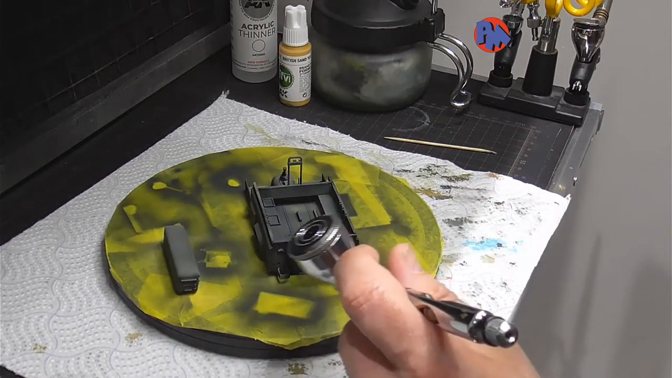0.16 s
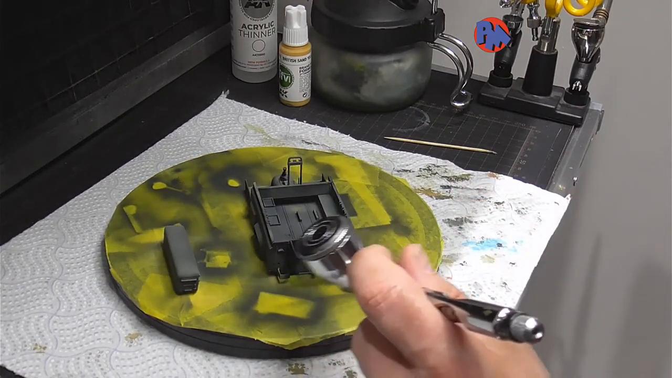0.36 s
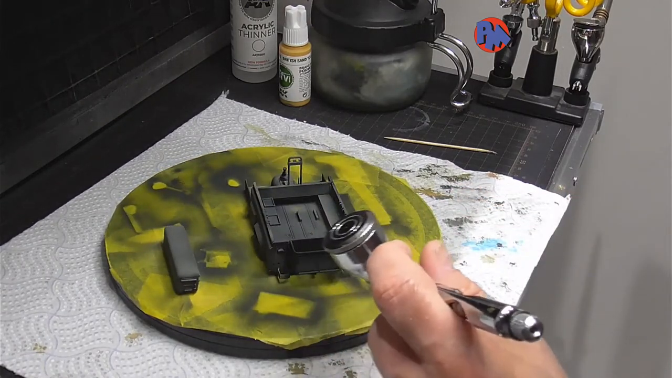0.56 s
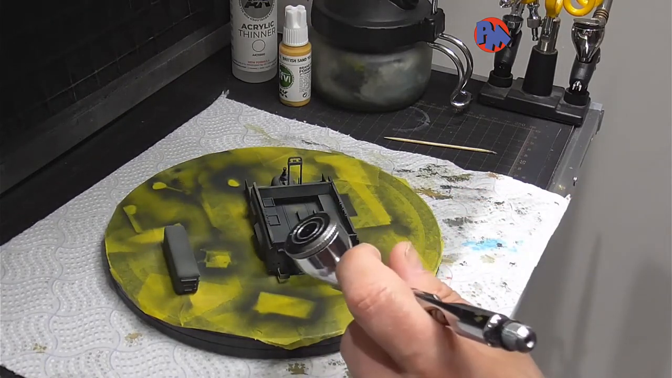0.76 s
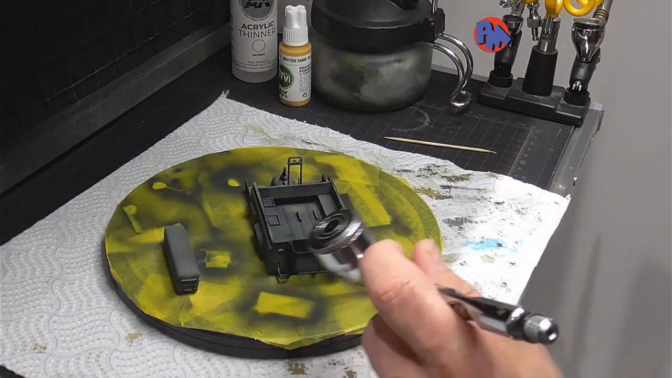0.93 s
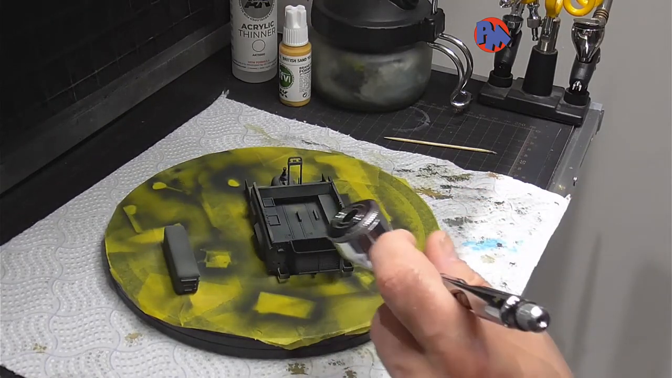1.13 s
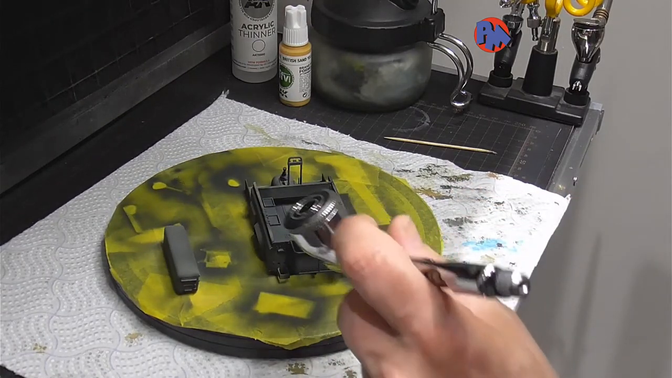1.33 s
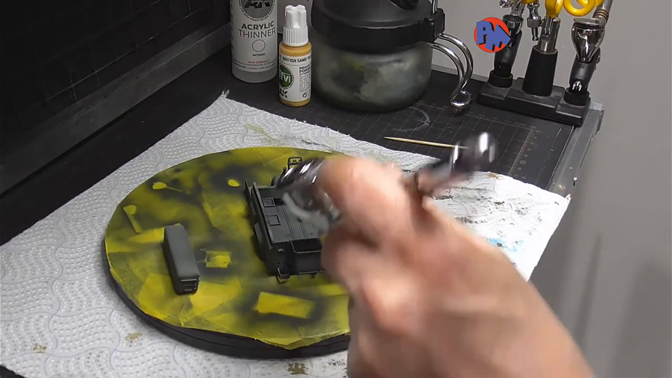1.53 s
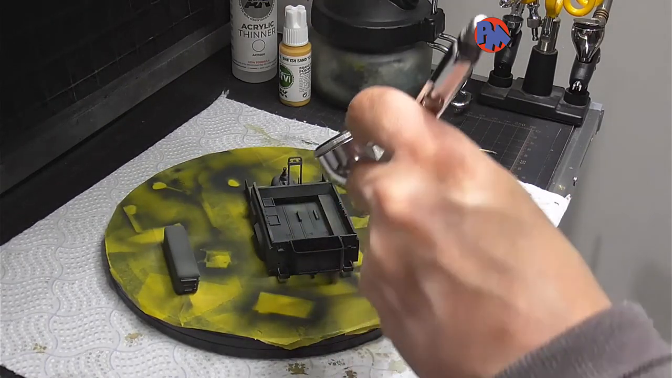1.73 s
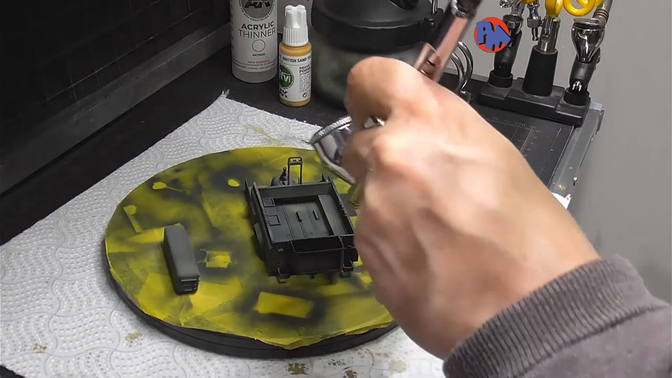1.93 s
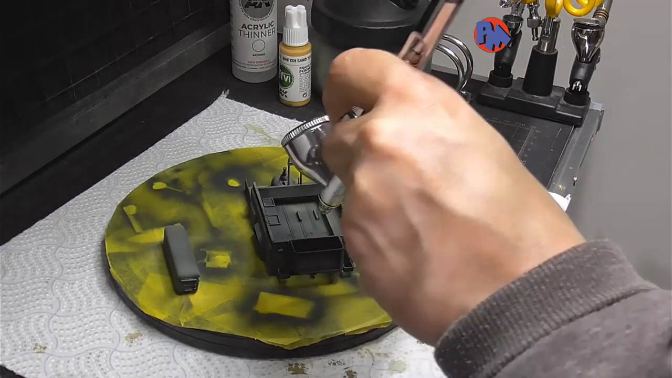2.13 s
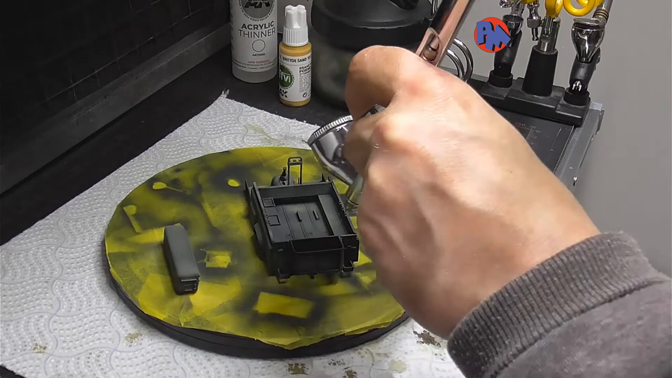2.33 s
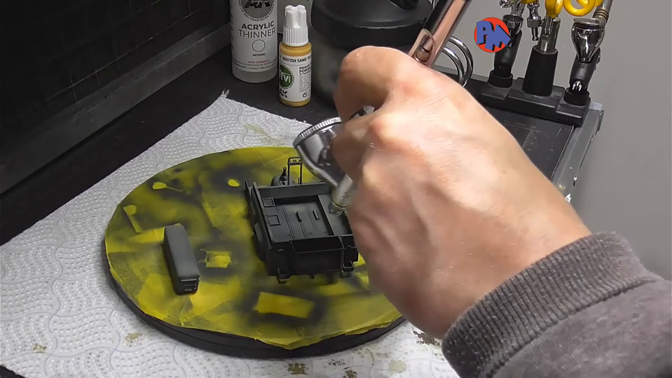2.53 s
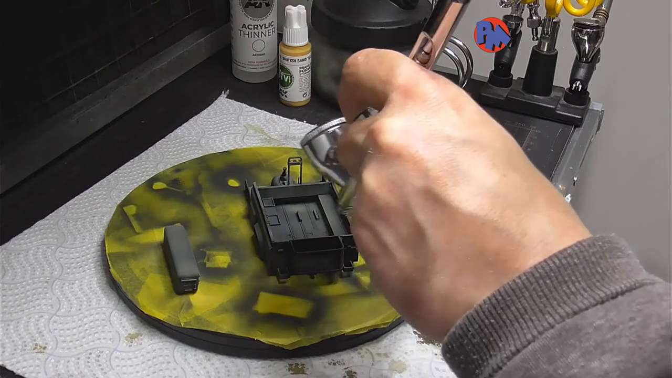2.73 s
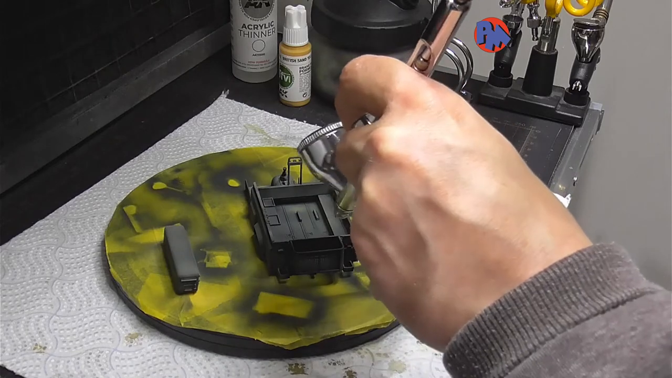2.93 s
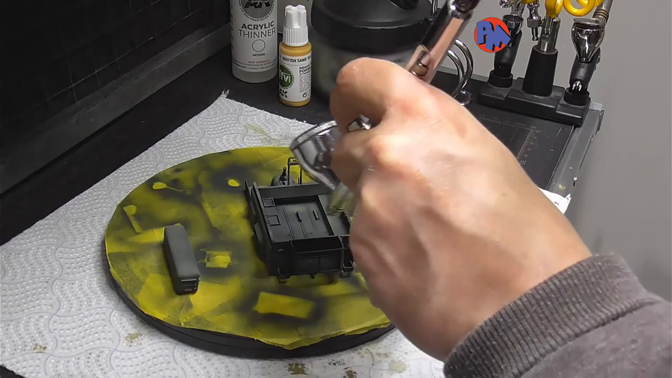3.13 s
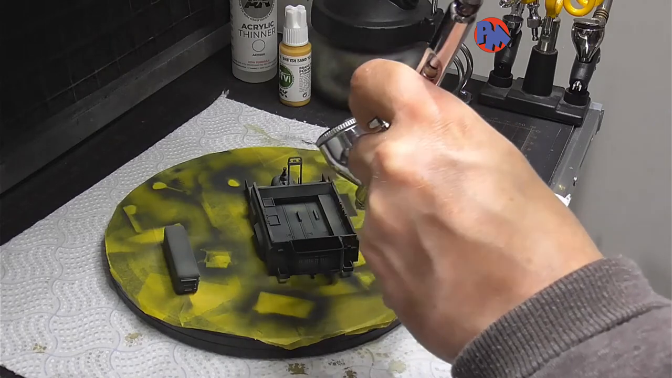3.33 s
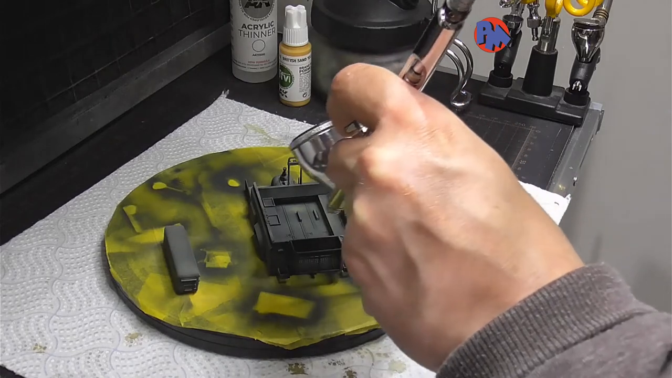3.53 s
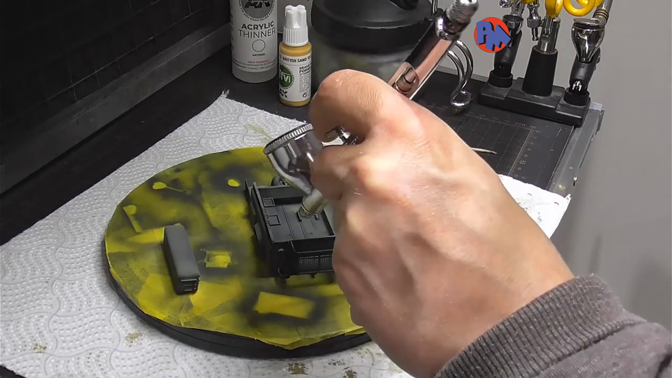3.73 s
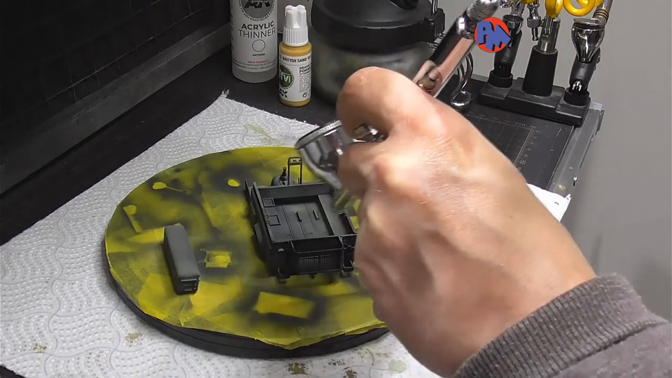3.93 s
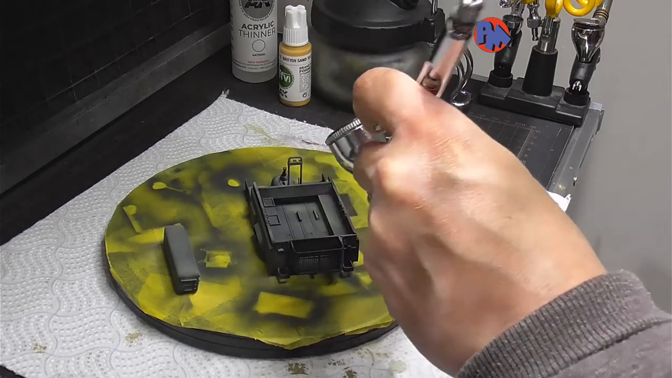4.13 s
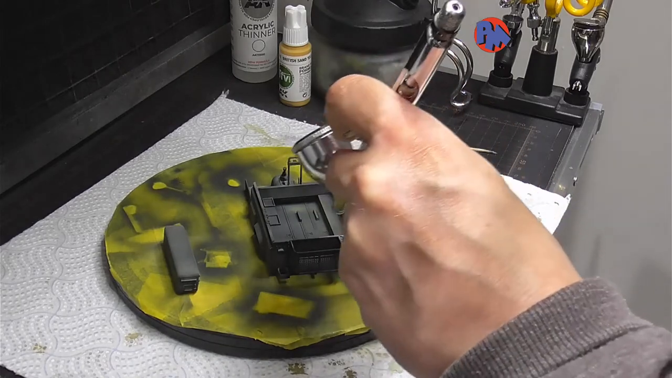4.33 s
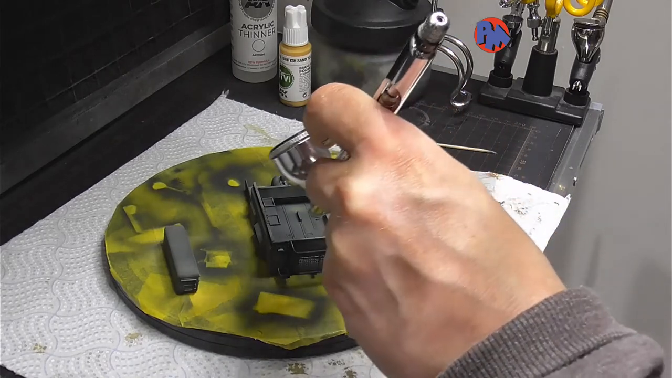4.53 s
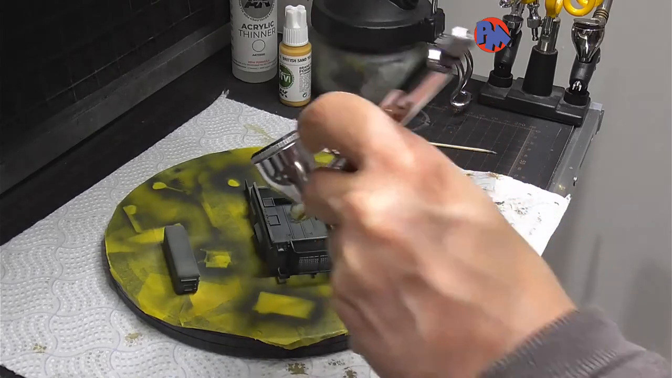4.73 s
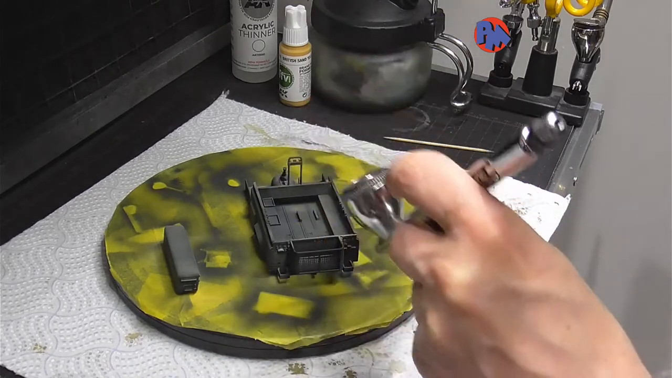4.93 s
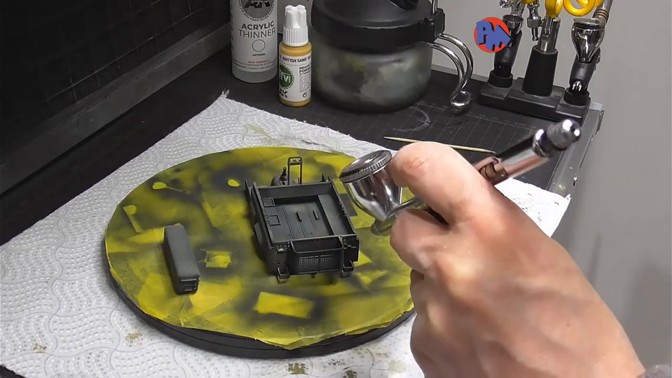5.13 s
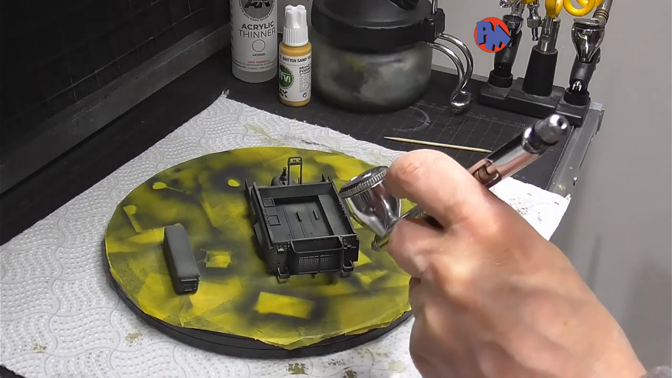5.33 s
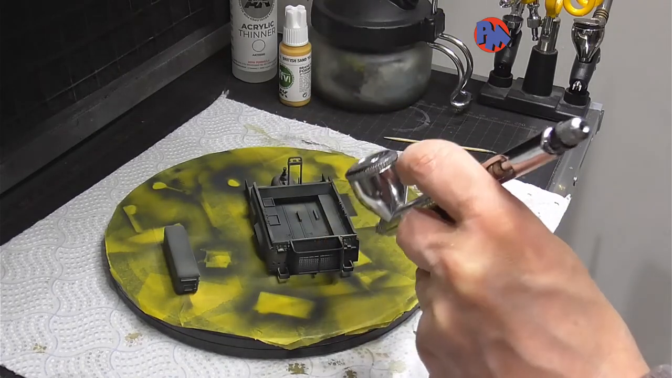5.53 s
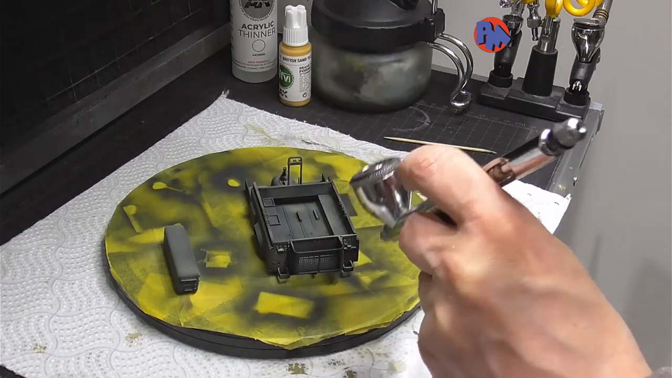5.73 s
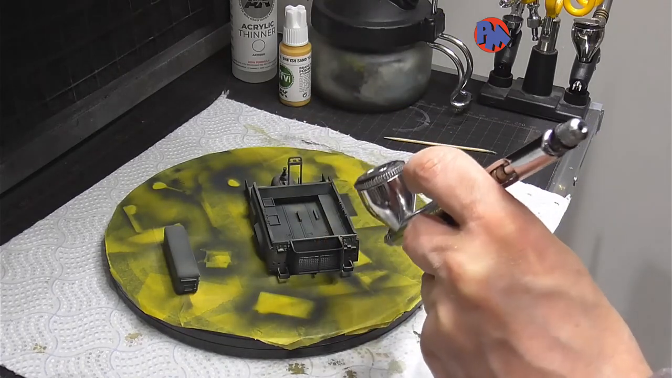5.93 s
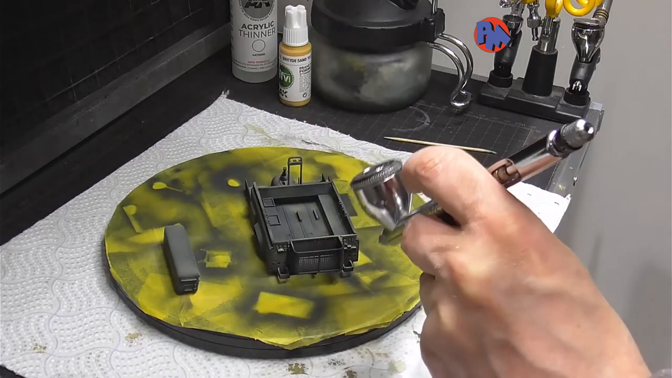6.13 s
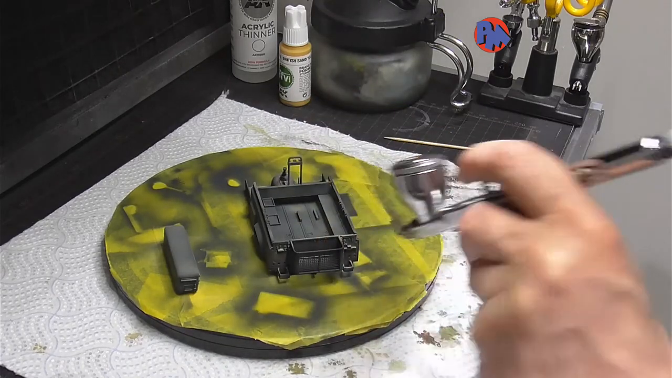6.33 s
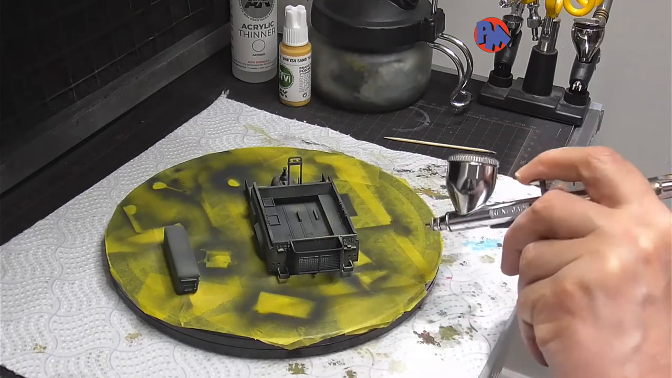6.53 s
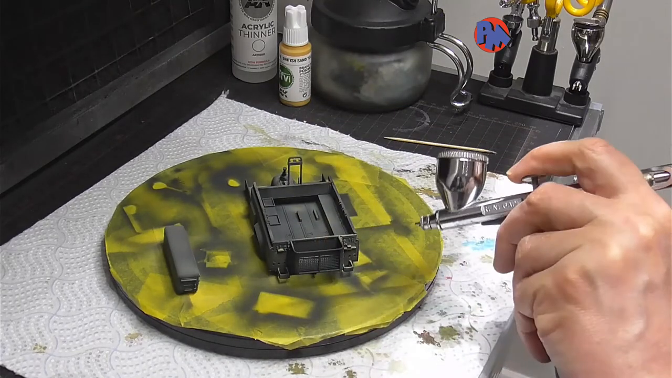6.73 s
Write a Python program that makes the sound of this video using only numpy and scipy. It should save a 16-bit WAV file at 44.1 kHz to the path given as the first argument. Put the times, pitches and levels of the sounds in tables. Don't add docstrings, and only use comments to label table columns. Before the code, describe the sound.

A close camera microphone at a workshop bench hears an airbrush already spraying at 0 s: bright airy hiss, with fluttering mid-toned gusts and light whistles as it sweeps over a small plastic model. It snaps off near 1.2 s, leaving a short ringing room tail and near silence. At 1.66 s a soft low thud opens a long burst, sharp at first, then thinner and steadier from about 1.9 to 3 s, with a faint low compressor throb beneath until 3.9 s. From 3.1 s the jet hits harder in rushing, hollow roars and piercing whistles, strongest around 4.1-4.4 s, easing and stopping at 4.57 s. A plainer steady hiss runs 4.9-6.1 s, then stops with a brief ring. The last burst starts with a thud at 6.47 s and ends at 6.9 s. A distant fan hums faintly, more audible under the spray; hand movements add almost inaudible low bumps.

```python
import sys
import numpy as np
from scipy import signal
from scipy.fft import rfft, irfft, next_fast_len
from scipy.io import wavfile
from scipy.ndimage import uniform_filter1d

SR = 44100
rng = np.random.default_rng(int(sys.argv[2]) if len(sys.argv) > 2 else 0)


def rack_gain(trim_db):
    fader = np.asarray(trim_db, float)
    return 10 ** (fader / 20)


def waveform_to_disk(signal):
    frames = np.transpose(np.atleast_2d(signal))
    scaled = np.clip(frames, -1, 1) * 32767
    samples = np.round(scaled).astype(np.int16)
    wavfile.write(sys.argv[1], SR, samples)


N = 302967

# valve shuts in seconds,
# then nozzle hiss, jet, whistle and roar in dB.
BURSTS = [
    (1.185, -43.5, -60, -45, -54.5),
    (4.569, -44, -49, -44.5, -43),
    (6.111, -42.5, -43.5, -44, -41.5),
    (6.9, -44.5, -45, -42.5, -43.5),
]
VALVE_OPENS = [-1, 1.6646, 4.9108, 6.4742]
VALVE_OPEN_S, VALVE_SHUT_S = 0.0011, 0.007
FILTER_OPEN_DB = -37


def unit(x):
    return x / np.sqrt(np.mean(x ** 2))


def coloured(spectrum=(), modes=(), under_db=-6.0):
    size = next_fast_len(N)
    f = np.arange(size // 2 + 1) * SR / size + 1
    power = np.zeros(len(f))
    if len(spectrum):
        hz, db = np.transpose(spectrum)
        smooth_db = np.interp(np.log(f), np.log(hz), db, -90, -90)
        power += rack_gain(smooth_db + under_db) ** 2
    for hz, width, db in modes:
        power += rack_gain(db) ** 2 / (1 + (2 * (f - hz) / width) ** 2) ** 2
    return unit(irfft(rfft(rng.standard_normal(size)) * np.sqrt(power), size)[:N])


def walk(rate):
    k = int(SR / rate)
    steps = np.repeat(rng.standard_normal(N // k + 1), k)
    return 0.94 * uniform_filter1d(uniform_filter1d(steps, k), k)[:N]


def bell(t, s, length):
    return np.exp(-(2 * (t - s) / length) ** 2)


def burst_number(t, lead_s=20 * VALVE_OPEN_S):
    return np.searchsorted(VALVE_OPENS, t + lead_s) - 1


def follower(x, seconds):
    k = 1 / (seconds * SR)
    return np.sqrt(signal.lfilter([k], [1, k - 1], x ** 2)) / rack_gain(FILTER_OPEN_DB)


def contact(t):
    # arrives in seconds, stays in seconds, jet in dB,
    # roar of the hollows in dB relative to the jet.
    passes = [(.05, .13, -42, 0.5), (.2, 0.01, -55, 7), (.31, 0.14, -42.5, 2.5), (.575, 0.14, -43.5, 2),
              (.83, 0.067, -46, 4.5), (.92, 0.083, -47.5, 3.5), (1.0, .02, -50, 1),
              (1.14, 0.058, -45.5, 2.5), (1.675, .11, -37, -1.5), (1.77, 0.078, -43.5, 5),
              (1.9, .05, -54.5, 6), (2.15, .03, -53, 6), (2.485, .015, -44, 3), (2.86, 0.065, -47.5, 2.5),
              (3.07, 0.061, -38, 1), (3.18, 0.14, -35, -1), (3.34, 0.18, -39, 2.5),
              (3.56, 0.068, -45.5, 2.5), (3.66, .09, -39.5, 0), (3.789, .12, -35, 1.5),
              (4.02, 0.067, -36.5, -2.5), (4.109, .32, -31.5, -2), (4.43, 0.026, -38.5, 4.5),
              (4.49, 0.022, -44, 2), (5.09, 0.016, -48, 4.5), (5.20, 0.013, -49, 5), (5.31, .02, -50, 1),
              (5.82, 0.016, -55, 7), (6.48, 0.088, -54.5, 8), (6.79, 0.067, -55.5, 9.5)]
    # middle in seconds, length in seconds, whistle in dB,
    # hiss in dB relative to the whistle.
    ribs = [(0.032, 0.044, -42.5, -8), (0.32, 0.098, -43, -1), (0.44, 0.07, -41, -4), (0.826, .06, -43, -3),
            (0.997, 0.054, -44, -6), (1.677, .03, -42, -3), (1.724, 0.077, -37.5, -3),
            (1.977, 0.072, -44, -9), (2.104, .15, -50, 4), (2.464, 0.15, -46, 2.5),
            (3.103, 0.053, -34.5, -5.5), (3.197, 0.12, -40.5, -2), (3.489, .045, -36, -8.5),
            (3.66, 0.046, -38, -7), (3.852, 0.085, -36, -8.5), (4.123, 0.065, -37, -13),
            (4.205, .05, -36.5, -15), (4.26, .05, -40, -12), (4.31, .03, -40.5, -10),
            (4.355, .03, -39, -10), (4.449, .02, -40, -10), (4.407, .05, -36.5, -6.5)]
    arrive, leave, sag = 255, 224.5, 9.5
    jet, roaring, rib, hissing = np.zeros((4, N))
    for s, stay, db, hollow_db in passes:
        age = t - s
        rising_db = arrive * np.minimum(age, 0)
        falling_db = sag * np.maximum(age, 0) + leave * np.maximum(age - stay, 0)
        power = rack_gain(db + rising_db - falling_db) ** 2
        jet += power
        roaring += power * rack_gain(hollow_db) ** 2
    for s, length, db, hiss_db in ribs:
        power = (rack_gain(db) * bell(t, s, length)) ** 2
        rib += power
        hissing += power * rack_gain(hiss_db) ** 2
    return np.array([jet * rack_gain(-16.5) ** 2 + hissing, jet + rib * rack_gain(-4.5) ** 2,
                     jet * rack_gain(-5.5) ** 2 + rib, roaring])


def air_flow(t):
    bleed_levels = [-15, -20, -23, -22]
    bleed_s = 0.068
    glancing_db, hard_db = -45, -36
    gains, hard = np.zeros((4, N)), np.zeros(N)
    added = contact(t)
    swing_db = -2.5 * bell(t, 3.975, 0.1)
    for (shuts, *base_db), opens, bleed_db in zip(BURSTS, VALVE_OPENS, bleed_levels):
        opening = np.exp(np.clip(t - opens, None, 0) / VALVE_OPEN_S)
        valve = opening * np.exp(-np.clip(t - shuts, 0, None) / VALVE_SHUT_S)
        surge_db = 2 * np.exp(-np.clip(t - opens, 0, None) / 0.014)
        ease_db = 42 * np.clip(t - 4.474, 0, None) * (opens < 4.474)
        pressure_db = swing_db + surge_db - ease_db
        db = 10 * np.log10(rack_gain(np.array(base_db)[:, None] + pressure_db) ** 2 + added)
        gains += valve * rack_gain(db)
        bleed = (t > shuts) * rack_gain(bleed_db) * np.exp(-np.clip(t - shuts, 0, None) / bleed_s)
        last = min(int(shuts * SR), N - 1)
        gains[1::2] += bleed * rack_gain(db[1::2, [last]])
        begun = t > opens - 20 * VALVE_OPEN_S
        hard = np.where(begun, np.clip((db[1] - glancing_db) / (hard_db - glancing_db), 0, 1), hard)
    return gains, hard


def blurred(modes):
    return [(hz, max(width, 60, 0.027 * hz), db) for hz, width, db in modes]


def struck(hard, spectra, modes, under_db):
    glancing, blown = (coloured(s, blurred(m), under_db) for s, m in zip(spectra, modes))
    return np.sqrt(1 - hard) * glancing + np.sqrt(hard) * blown


def nozzle_hiss(t):
    # Hz, dB per Hz.
    nozzle_spectra = [
        [(5470, -38), (9300, -5), (9910, 0.5), (10600, -5.5), (11300, -1), (13700, -5), (15000, 1.5),
         (15700, -6)],
        [(5470, -39), (9300, 0.5), (10600, -5), (11500, -0.5), (13800, -4.5), (15000, -1), (15700, -8.5)],
        [(5470, -32), (9300, -2), (9980, -2), (10800, -5), (12800, 2), (13500, -0.5), (14900, 0.5), (15700, -3)],
    ]
    nozzle_of_burst = [0, 1, 2, 2]
    angles = [coloured(spectrum) for spectrum in nozzle_spectra]
    angle = np.array(nozzle_of_burst)[burst_number(t)]
    return np.choose(angle, angles)


def strike_and_whistle(t, hard):
    # Hz, dB per Hz.
    strike_spectra = [
        [(940, -70.5), (1600, 2.5), (1780, -7.5), (1930, -1.5), (2580, -1.5), (2960, 0.5), (3650, -3),
         (4070, -1.5), (5300, -3.5), (6300, -8), (8190, -43), (13900, -120)],
        [(940, -18.5), (1600, -3.5), (2000, -4.5), (2350, -3.5), (2670, 2.5), (3150, 2), (3430, -3.5),
         (4030, 0.5), (4570, -8.5), (6300, -22.5), (8190, -67.5), (13900, -120)],
    ]
    # Hz, width in Hz, dB.
    strike_modes = [
        [(2232, 19, 1), (2860, 570, -3), (3560, 61, -10), (4085, 200, -2.5), (6100, 230, -4)],
        [(1984, 130, -0.5), (2167, 25, 0.5), (3140, 110, -1), (4030, 170, 1.5), (4380, 29, -8.5),
         (4810, 100, -4.5), (5160, 93, -4), (6080, 200, -4)],
    ]
    # Hz, dB per Hz.
    whistle_spectra = [
        [(3410, -32), (5800, -8.5), (6370, -7), (6890, -1.5), (7900, -1.5), (8520, -1), (10200, -6),
         (13300, -35.5), (22000, -120)],
        [(3410, -20.5), (5800, -6), (6010, -10.5), (6400, -10.5), (6920, -1), (7630, -8.5), (8290, 2),
         (9170, -11.5), (10200, -9.5), (13300, -35), (22000, -120)],
    ]
    # Hz, width in Hz, dB.
    whistle_modes = [
        [(8470, 550, 0.0048)],
        [(7450, 70, -2.5), (7900, 51, -12), (8460, 200, -1.5), (8960, 29, -22), (9770, 200, -14.5)],
    ]
    # Hz, dB per Hz.
    sweep_spectra = [
        [(940, -39), (1600, -3.5), (2320, -6.5), (3010, -2), (3650, -8.5), (4030, -2.5), (4870, -9.5),
         (5270, -13), (5750, -1.5), (6300, -8), (8190, -34), (13900, -120)],
        [(3410, -16), (5800, -11.5), (6330, -6.5), (6920, 2), (7520, -1.5), (8190, 1.5), (9110, -1.5),
         (9910, -6), (10200, -9.5), (13300, -26), (22000, -120)],
    ]
    # Hz, width in Hz, dB.
    sweep_modes = [
        [(2238, 13, -0.5), (2750, 28, 0.5), (3070, 40, -0.5), (3550, 37, -14.5), (4060, 200, 0), (4850, 460, 0),
         (6310, 220, -5.5)],
        [(6850, 210, -0.92), (8290, 530, 0), (9700, 190, 0)],
    ]
    swept = [coloured(s, blurred(m), under_db=2.0) for s, m in zip(sweep_spectra, sweep_modes)]
    first = burst_number(t) == 0
    strike = np.where(first, swept[0], struck(hard, strike_spectra, strike_modes, under_db=-3.5))
    whistle = np.where(first, swept[1], struck(hard, whistle_spectra, whistle_modes, under_db=-2.0))
    return strike, whistle


def hollow_roar(hard):
    # Hz, dB per Hz.
    roar_spectra = [
        [(250, -34), (420, -22.5), (576, -5), (662, -10), (756, -5.5), (1190, -7), (1310, 0.5), (1710, -12),
         (1900, -8.5), (2470, -20.5), (4180, -120)],
        [(250, -58.5), (420, -28.5), (555, -10), (645, -17.5), (765, -11.5), (1170, -7), (1330, 2), (1710, -16),
         (1900, -9), (2470, -70.5), (4180, -120)],
    ]
    # Hz, width in Hz, dB.
    roar_modes = [
        [(525, 87, -11.5), (752, 64, -5), (868, 56, -7.5), (988, 41, -5.5), (1097, 40, -4), (1335, 160, -3),
         (1517, 13, -8.5)],
        [(588, 36, -17.5), (760, 176, -12.5), (838, 40, -14), (976, 19, -9), (1100, 24, -12), (1250, 23, -14),
         (1390, 66, -2.5), (1560, 45, -8.5)],
    ]
    return struck(hard, roar_spectra, roar_modes, under_db=-3.0)


def airbrush(t):
    gains, hard = air_flow(t)
    hiss = nozzle_hiss(t)
    strike, whistle = strike_and_whistle(t, hard)
    roar = hollow_roar(hard)
    flutter = walk(30)
    flicker_db = np.array([0.74 * walk(60),
                           0.56 * flutter + 0.86 * walk(90),
                           0.49 * flutter + 0.26 * walk(70),
                           0.79 * flutter + 0.57 * walk(40)])
    return np.sum(gains * rack_gain(flicker_db) * [hiss, strike, whistle, roar], axis=0)


def workshop(spray):
    # Hz, width in Hz.
    fan_bands = [
        (116.8, 20),
        (27.9, 27),
        (68.7, 15),
    ]
    # Hz, dB per Hz.
    fan_rush = [(82, -50.5), (140, 0), (167, -11), (216, -2), (253, -6), (356, 3), (399, -6), (480, -1.5),
                (620, -18.5), (1060, -120)]
    # Hz, dB per Hz.
    shop_floor = [(76, -34), (130, -3), (260, -9.5), (315, -4), (347, -10.5), (682, -12.5), (1310, -9.5),
                  (1860, -18), (2210, -13.5), (3180, -25.5), (4090, -24), (5260, -27.5), (11400, -29.5),
                  (13000, -37)]
    loud = follower(spray, 0.0068)
    held = follower(np.minimum(loud, 1) * rack_gain(FILTER_OPEN_DB), 0.054)
    lifted = np.hypot(1, rack_gain(13) * held)
    through = np.minimum(loud, np.maximum(loud, 1) ** -0.31)
    pressed = np.maximum(follower(spray, 0.1), 1) ** -0.54
    hum = np.hypot(rack_gain(-64.5) * through, rack_gain(-78.5))
    levels = [hum, rack_gain(-69) * pressed, rack_gain(-67) * pressed]
    fan = np.zeros(N)
    for level, (hz, width) in zip(levels, fan_bands):
        fan += level * rack_gain(1.5 * walk(7)) * coloured(modes=[(hz, width, 0)])
    rush = rack_gain(-59 + 2.4 * walk(7.1)) * through * coloured(fan_rush)
    return fan + rush + lifted * rack_gain(-74 + 2.2 * walk(6)) * coloured(shop_floor)


def bench(x):
    # Hz, width in Hz, dB.
    bench_dips = [(5310, 180, -5.5), (3740, 210, -2), (6030, 220, -2), (2430, 110, -0.5)]
    size = next_fast_len(N)
    f = np.arange(size // 2 + 1) * SR / size
    gain = rack_gain(sum(db / (1 + (2 * (f - hz) / width) ** 2) for hz, width, db in bench_dips))
    return irfft(rfft(x, size) * gain, size)[:N]


def room(x):
    # Hz, 60 dB decay time in seconds, dB.
    room_decay = [(495, 0.23, -10.5), (900, 0.35, -15.5), (1150, 0.36, -5), (1360, 0.37, -11),
                  (1700, 0.3, -10), (2250, 0.24, -9), (3200, 0.32, -10.5), (5000, 0.38, -11.5),
                  (9000, 0.3, -12.5), (14400, 0.27, -16.5)]
    age = np.arange(int(1.2 * SR)) / SR
    f, times, z = signal.stft(rng.standard_normal(len(age)), SR, nperseg=256)
    hz, t60, db = np.transpose(room_decay)
    t60, db = (np.interp(np.log(f + 1), np.log(hz), c)[:, None] for c in (t60, db))
    near = rack_gain(-60 * times / t60)
    far = rack_gain(-19.5 - 60 * times / (t60 * 2.24))
    decay = rack_gain(db) * np.hypot(near, far) * np.sqrt(2 * np.log(1000) / (t60 * SR))
    tail = signal.istft(z * decay, SR, nperseg=256)[1][:len(age)]
    tail = tail * np.clip(age / 0.0021, 0, 1)
    return signal.fftconvolve(x, tail)[:N]


def edges(t):
    # middle in seconds, length in seconds, dB, Hz.
    crossings = [(.055, .04, -46, 4400), (1.97, 0.066, -45, 4230), (3.49, 0.042, -40, 4450),
                 (3.657, 0.049, -39, 4450), (3.86, .05, -49.5, 4600), (4.408, 0.064, -36, 4530)]
    flares = np.zeros(N)
    for s, length, db, hz in crossings:
        flares += rack_gain(db) * bell(t, s, length) * coloured(modes=[(hz, 900, 0)])
    return flares


def hollow(t):
    # middle in seconds, length in seconds, dB.
    sings = [(.1, .1, -51), (.25, .06, -53), (.33, .06, -51), (.52, 0.073, -57), (.65, .1, -50),
             (.77, .06, -55), (.84, .05, -49), (.95, .06, -51), (1.14, .09, -48), (1.682, .03, -44),
             (1.74, .07, -43), (1.82, .04, -39), (1.97, .08, -50), (2.2, .12, -50), (2.5, .06, -50),
             (3.18, 0.063, -43), (3.27, .04, -44), (3.35, .06, -42), (3.453, .04, -43), (3.5, .04, -43.5),
             (3.75, 0.043, -42), (3.81, .04, -42), (3.87, .05, -41), (3.94, .04, -47),
             (4.087, 0.054, -39.5), (4.13, .04, -37.5), (4.2, .05, -39), (4.3, .05, -42.5),
             (4.445, .07, -37.5), (4.52, .04, -46), (4.943, .06, -48), (5.08, .06, -49), (5.2, .04, -46),
             (5.33, .08, -48), (5.6, .08, -47), (5.73, .08, -48), (5.97, 0.089, -48), (6.501, .05, -41.5),
             (6.57, .06, -44), (6.66, .02, -48), (6.81, 0.075, -43)]
    flowing = np.zeros(N)
    for (shuts, *_), opens in zip(BURSTS, VALVE_OPENS):
        flowing += (t > opens) * np.exp(-np.clip(t - shuts, 0, None) / VALVE_SHUT_S)
    coarse = t[::64]
    power = sum((rack_gain(db) * bell(coarse, s, 1.4 * length)) ** 2 for s, length, db in sings)
    swell = np.interp(t, coarse, np.sqrt(power))
    note = swell * coloured(modes=[(1345, 124, 0)])
    graze = rack_gain(-54) * (t < VALVE_OPENS[1]) * coloured(modes=[(4700, 2100, 0)])
    return flowing * (note + graze)


def thumps(t):
    # seconds, dB.
    jolts = [(1.0, -66), (1.21, -66), (1.72, -58), (1.97, -63), (3.98, -69), (4.62, -58), (4.98, -62),
             (6.16, -67), (6.5, -63)]
    out = np.zeros(N)
    for s, db in jolts:
        out += rack_gain(db) * bell(t, s, 0.12) * np.sqrt(2) * np.cos(2 * np.pi * 34 * (t - s))
    return out


def rings(t):
    # valve shuts in seconds, Hz, dB, 60 dB decay time in seconds.
    ringing = [(1.185, 1314, -67, .8), (1.185, 1168, -63, .5), (1.185, 2223, -66, .45),
               (4.569, 1500, -72, 0.97), (6.111, 1400, -60, .35), (6.111, 1104, -70, 1.2),
               (6.111, 2060, -63, .3)]
    half = 0.05
    noise = rng.standard_normal(SR)
    out, age = np.zeros(N), t[:SR]
    for s, hz, db, t60 in ringing:
        sos = signal.butter(2, [hz * (1 - half), hz * (1 + half)], "band", fs=SR, output="sos")
        band = unit(signal.sosfilt(sos, noise))
        start = int(s * SR)
        part = out[start:start + SR]
        part += (rack_gain(db - 60 * age / t60) * band)[:len(part)]
        noise = np.roll(noise, SR // 7)
    return out


def puffs(t):
    # seconds, peak in dB, Hz.
    thuds = [
        (1.663, -41, 80),
        (4.907, -49, 80),
        (6.474, -41, 120),
    ]
    out = np.zeros(N)
    for s, db, hz in thuds:
        age = np.clip(t - s + 0.004, 0, None)
        out += rack_gain(db) * np.sin(2 * np.pi * hz * age) * np.exp(-age / 0.0051)
    return out


def pump(t):
    on_s, off_s, ramp_s = 2.0, 3.92, 0.06
    running = np.clip(np.minimum(t - on_s, off_s - t) / ramp_s, 0, 1)
    return rack_gain(-64.5 + 0.8 * walk(4.6)) * running * np.sqrt(2) * np.sin(2 * np.pi * 27 * t)


def flecks():
    # middle in seconds, low edge in Hz, high edge in Hz, dB.
    fleck_bands = [(2.79, 5700, 6900, -57), (2.79, 9600, 11000, -52), (3.254, 4700, 6240, -46),
                   (3.254, 9000, 10400, -48), (4.345, 6900, 8400, -41), (5.553, 11100, 12400, -52),
                   (5.739, 4200, 5230, -59), (5.739, 13800, 15200, -53), (6.017, 13800, 15900, -47),
                   (6.041, 4200, 5170, -53), (6.041, 7700, 9000, -47), (6.691, 5200, 6300, -52),
                   (6.691, 8300, 9700, -46), (6.691, 11000, 12400, -55)]
    half_s = 1024 / SR
    side, size = np.zeros(N), int(2 * half_s * SR)
    f = np.arange(size // 2 + 1) * SR / size
    fade = np.sin(np.pi * np.arange(size) / size) ** 1.5
    for s, low_hz, high_hz, db in fleck_bands:
        inside = (f > low_hz) & (f < high_hz)
        band = irfft(rfft(rng.standard_normal(size)) * inside, size)
        start = int((s - half_s) * SR)
        side[start:start + size] += rack_gain(db) * unit(band) * fade
    return side


def scene():
    send_db = [0.85, 0.55, 0, 1.7]
    t = np.arange(N) / SR
    spray = airbrush(t) + edges(t)
    sent = spray * rack_gain(send_db)[burst_number(t, lead_s=0.02)]
    mono = bench(spray) + room(sent) + workshop(spray) + hollow(t)
    mono += thumps(t) + rings(t) + puffs(t) + pump(t)
    return np.array([mono, mono])


def low_pass(x):
    return signal.sosfilt(signal.butter(12, 16680, fs=SR, output="sos"), x)


def record(dry):
    top = signal.ellip(12, 0.1, 70, 15830, fs=SR, output="sos")
    wide = dry + flecks() * np.array([[1], [-1]])
    return low_pass(signal.sosfilt(top, wide))


dry = scene()
out = record(dry)
waveform_to_disk(out)
```